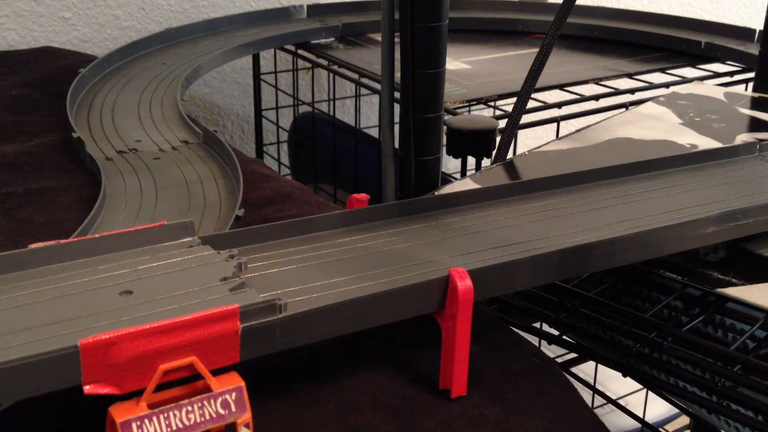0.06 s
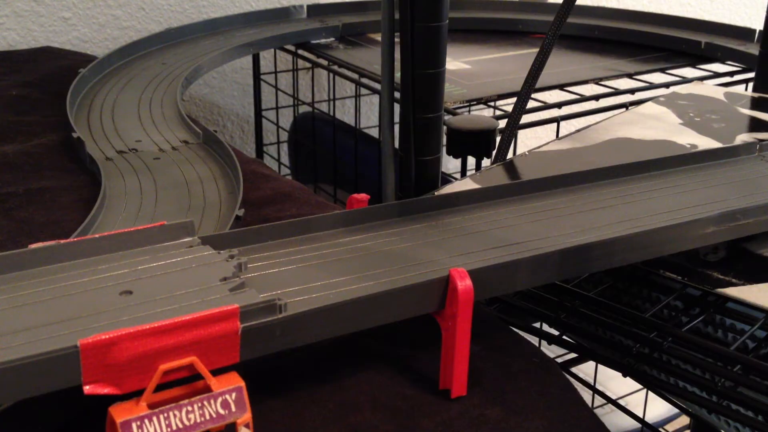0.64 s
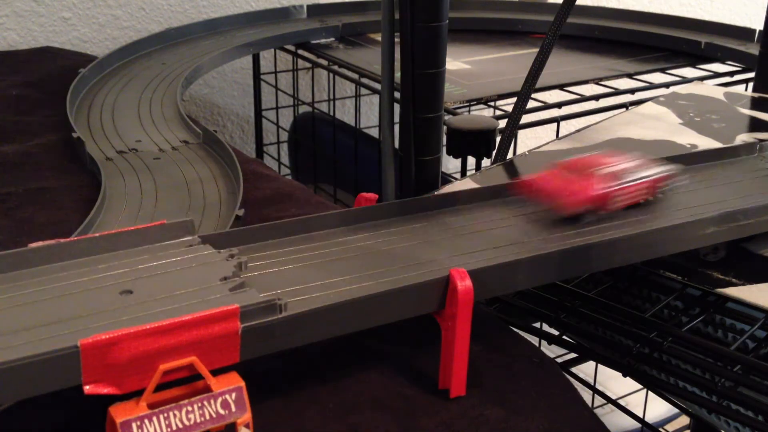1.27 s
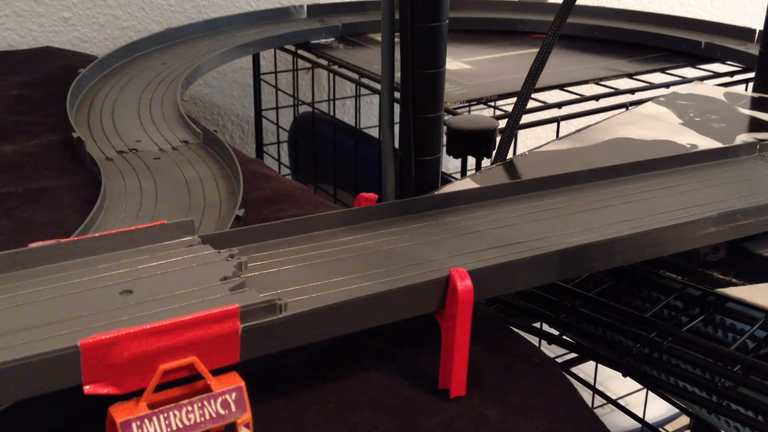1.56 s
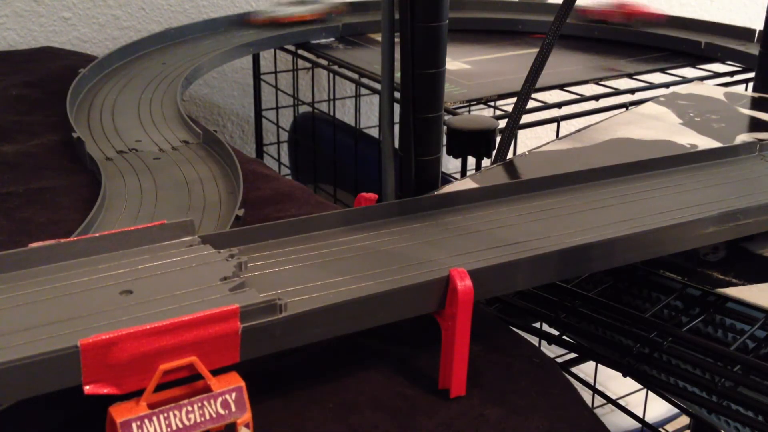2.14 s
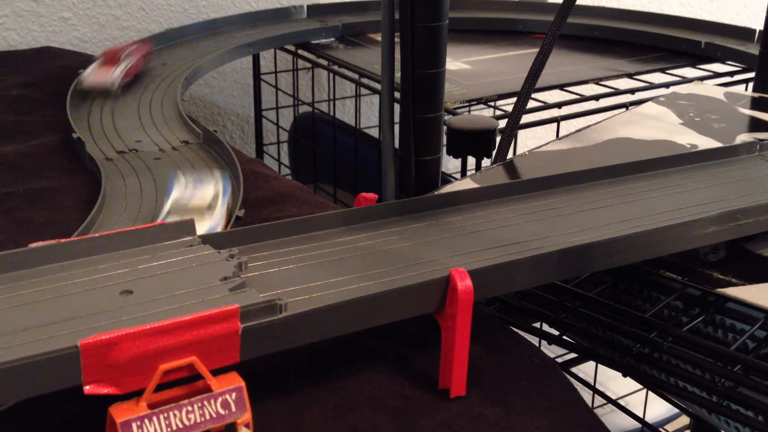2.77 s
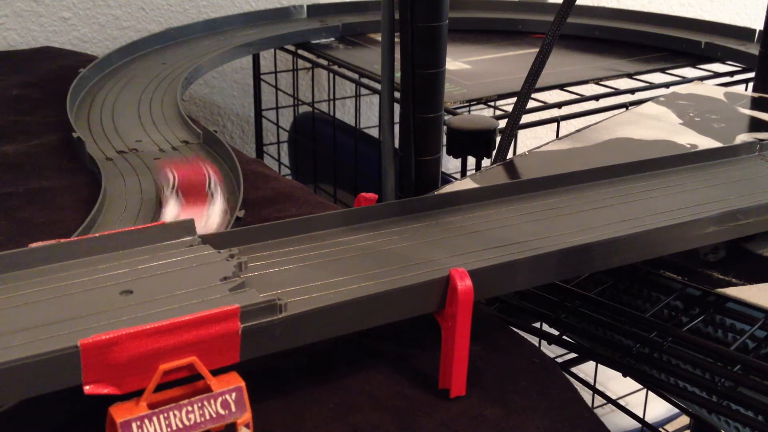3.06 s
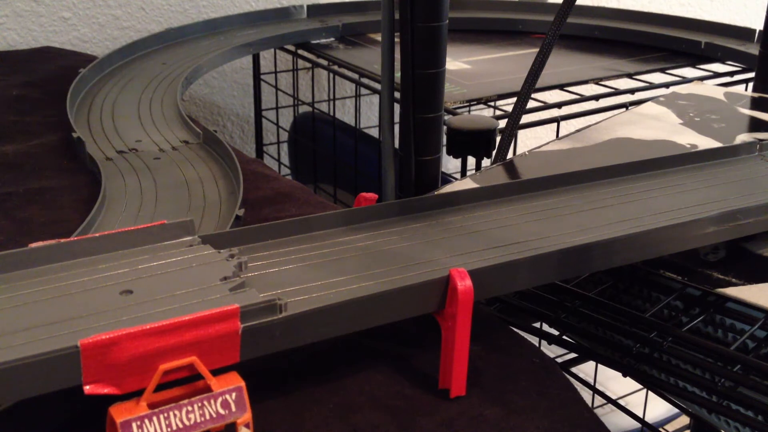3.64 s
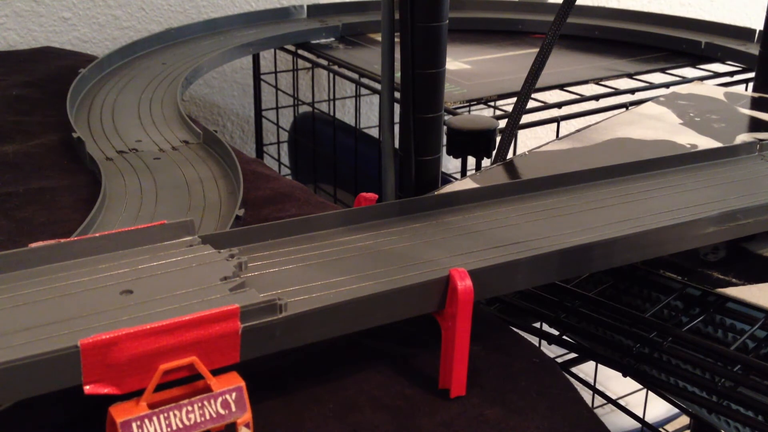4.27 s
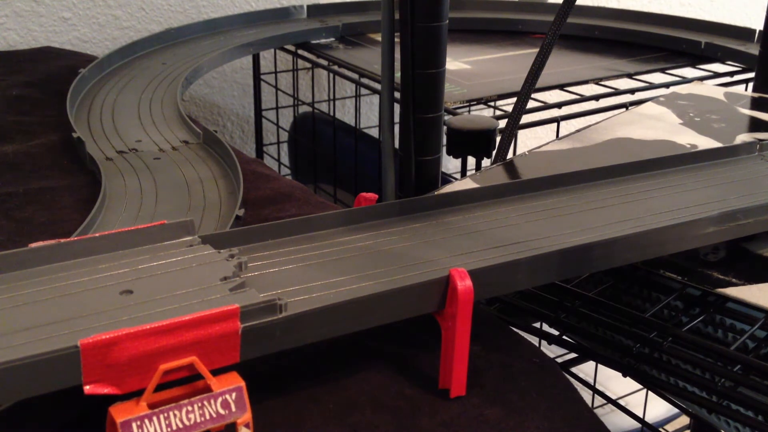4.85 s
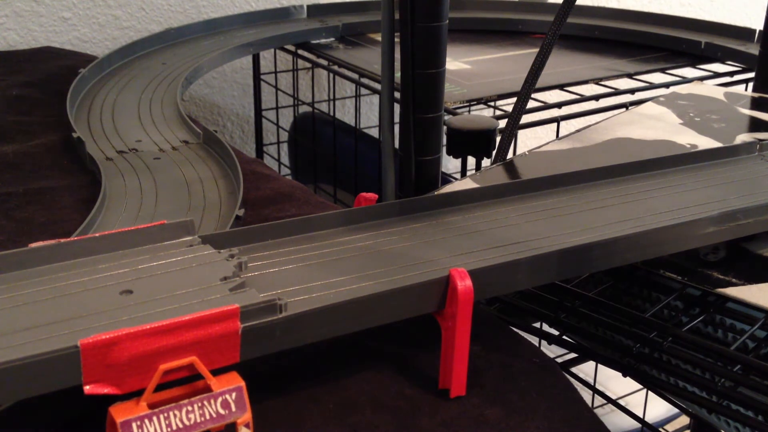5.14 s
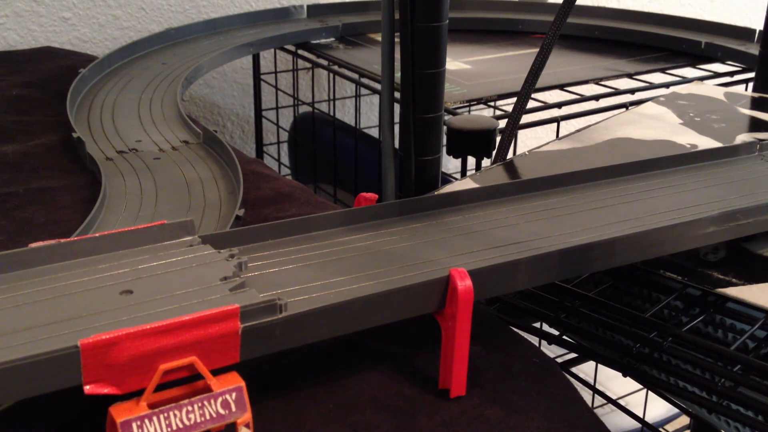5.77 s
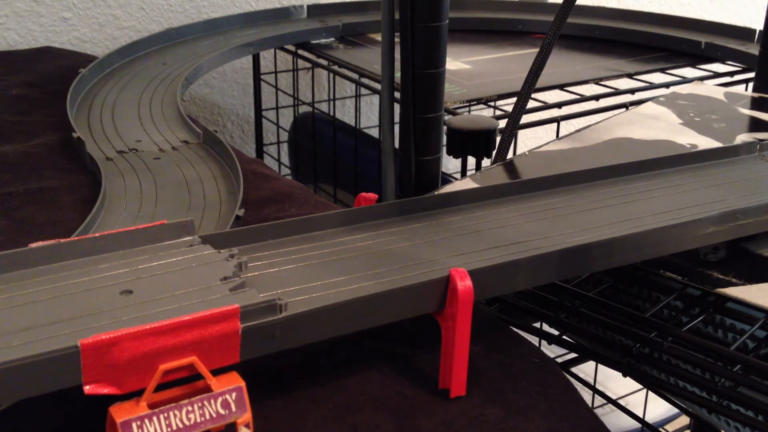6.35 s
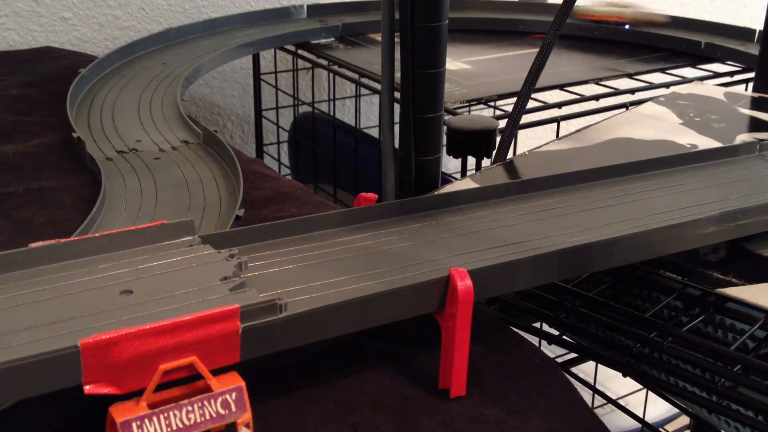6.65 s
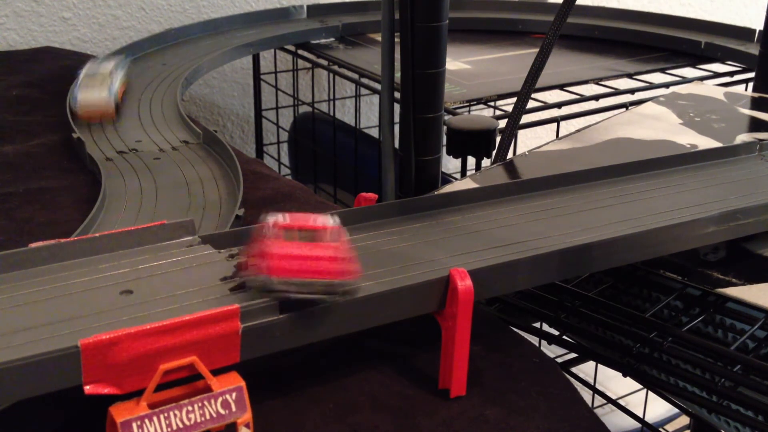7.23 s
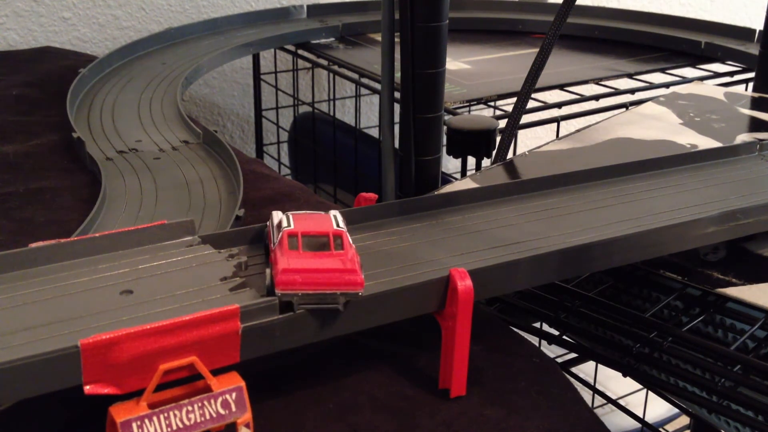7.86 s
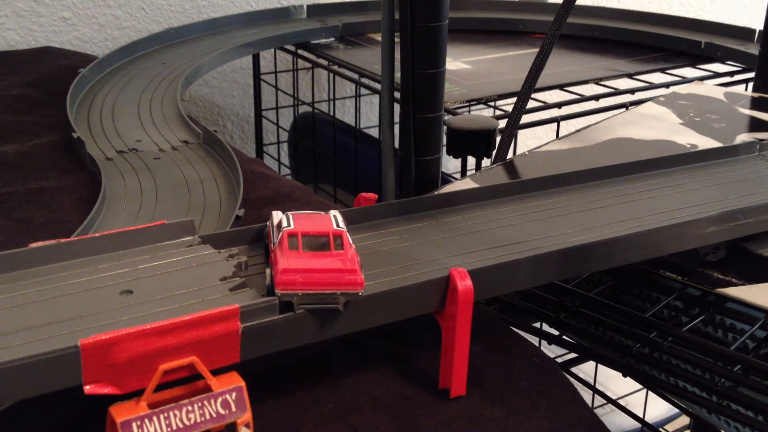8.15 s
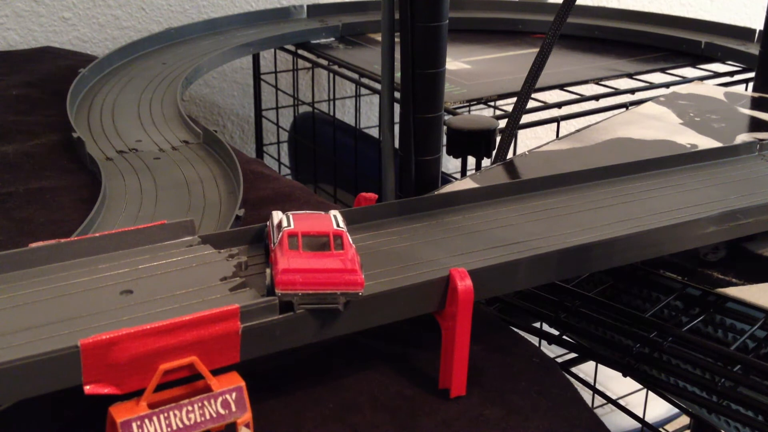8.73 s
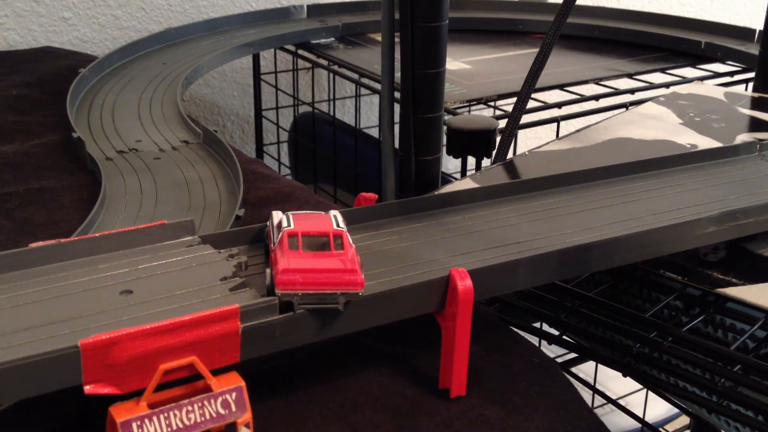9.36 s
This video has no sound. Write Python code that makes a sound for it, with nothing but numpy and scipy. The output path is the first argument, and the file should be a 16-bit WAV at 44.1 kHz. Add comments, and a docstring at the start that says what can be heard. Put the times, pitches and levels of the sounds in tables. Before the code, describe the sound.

A continuous bright whirr and gritty hiss comes from two small slot cars racing on a plastic tabletop track, close to the microphone in a small room. The rattling rises and falls as they pass, dotted with irregular clacks, short scrapes, soft hollow thuds and brief motor whines. About three quarters of the way through, one car clatters out of its slot while the other runs on to the end.

```python
"""Two toy slot cars lap a plastic tabletop track in a small room, heard from close by.
From the start, over a faint drone, wheels drum on the hollow track, gears whirr, shells rattle
and pickup shoes hiss along the metal rails, swelling with each pass. Lap after lap the cars
scrape through bends and clack over joints. Late on, one jumps its slot in a burst of hard
clacks and skids; the other runs on to the end."""
import sys
import numpy as np
from scipy import signal
from scipy.fft import rfft, irfft
from scipy.io import wavfile
from scipy.ndimage import uniform_filter1d, map_coordinates

SR = 44100
rng = np.random.default_rng(int(sys.argv[2]) if len(sys.argv) > 2 else 0)


def generate_wav(sig):
    """Save sig (samples, or channels by samples) to the path in sys.argv[1] as 16-bit PCM at SR."""
    pcm = np.round(np.clip(np.atleast_2d(sig).T, -1, 1) * 32767).astype(np.int16)
    wavfile.write(sys.argv[1], SR, pcm)


N = 414540
TIME = np.arange(N) / SR


def from_db(db):
    """Decibels to gain."""
    return 10 ** (np.asarray(db) / 20)


def unit_rms(x):
    """Scale to rms 1."""
    return x / np.sqrt(np.mean(x ** 2) + 1e-20)


def curves(rows):
    """Level columns of a timed table, interpolated per sample."""
    times_s, *columns = np.transpose(rows)
    return [np.interp(TIME, times_s, column) for column in columns]


def swell(centre_s, half_width_s):
    """Gaussian bump, height 1."""
    return np.exp(-np.minimum(((TIME - centre_s) / half_width_s) ** 2, 20))


def drift(per_s):
    """Random wander through per_s new values a second; rms 1."""
    return unit_rms(np.interp(TIME * per_s, np.arange(1000), rng.standard_normal(1000)))


def chatter(per_s, spread_db, t60_s):
    """Power of tiny random bounces: instant rise, fast decay; mean 1."""
    sizes = from_db(spread_db * np.minimum(rng.exponential(1, N), 3.5)) ** 2
    bounces = sizes * (rng.random(N) < per_s / SR)
    power = signal.lfilter([1], [1, -from_db(-120 / (t60_s * SR))], bounces + 1e-18)
    return power / power.mean()


def friction(bounces, share):
    """Sliding contact force, with a share of its power in bounces."""
    return rng.standard_normal(N) * np.sqrt(1 - share + share * bounces)


def grit(per_s, spread_db):
    """Sharp ticks of dust and sparks under the shoes; rms 1."""
    sizes = from_db(spread_db * np.minimum(rng.exponential(1, N), 4)) * rng.choice([-1, 1], N)
    return unit_rms(sizes * (rng.random(N) < per_s / SR))


def supply(ripple, mains_hz=59.9):
    """Motor throb from mains ripple in the track current."""
    return 1 + ripple * np.sin(2 * np.pi * mains_hz * TIME)


def blows(starts_s, levels_db, t60s_s, snap_db, room_db=-16.5, room_t60_s=0.29, size=12000):
    """Impact force: a snap, a dying buzz of loose plastic, then the room's diffuse tail."""
    force, age_s = np.zeros(N + size), np.arange(size) / SR
    attack = 1 - np.exp(-age_s / 0.00037)
    tail = from_db(room_db - 60 * age_s / room_t60_s)
    for start_s, level_db, t60_s in zip(starts_s, levels_db, t60s_s):
        buzz = from_db(-60 * age_s / t60_s)
        envelope = from_db(level_db) * attack * np.hypot(buzz, tail)
        start = round(start_s * SR)
        force[start:start + size] += envelope * rng.standard_normal(size)
        force[start] += from_db(level_db + snap_db)
    return force[:N]


def body(force, colour, modes=(), size=8192):
    """Driven body: broad colour plus resonances, as a minimum-phase response of unit energy."""
    freq_hz = np.maximum(np.arange(size // 2 + 1) * SR / size, 1)
    knots_hz, knots_db = np.transpose(colour)
    gain_db = np.interp(np.log(freq_hz), np.log(knots_hz), knots_db)
    for centre_hz, width_hz, lift_db in modes:
        gain_db += lift_db / (1 + (2 * (freq_hz - centre_hz) / width_hz) ** 2)
    cepstrum = irfft(np.log(from_db(gain_db)))[:size // 2]
    response = irfft(np.exp(2 * rfft(cepstrum, size)))
    return signal.oaconvolve(force, response / np.linalg.norm(response))[:N]


def sing(force, pitch_hz, width_hz):
    """Steep-sided resonance: two driven resonators in series; rms 1."""
    stage_width_hz = width_hz * np.pi / 2
    radius = np.exp(-np.pi * stage_width_hz / SR)
    feedback = [1, -2 * radius * np.cos(2 * np.pi * pitch_hz / SR), radius ** 2]
    for _ in range(2):
        force = signal.lfilter([1, 0, -1], feedback, force) * (1 - radius ** 2) / 2
    return unit_rms(force)


def sung_swells(rows, force, width_hz):
    """Unsteady tones that swell and fade, driven by one force."""
    return sum(from_db(level_db) * swell(centre_s, half_width_s) * sing(force, pitch_hz, width_hz)
               for centre_s, half_width_s, level_db, pitch_hz in rows)


def rasp(modes, bounces, share, wander_per_s, bend, wander_db=3.0, bend_hz=5):
    """Loose parts buzz in turn: each mode swells, fades and bends by itself; rms 1."""
    out = 0
    for pitch_hz, width_hz, level_db in modes:
        own_bounces = chatter(per_s=130, spread_db=4.5, t60_s=0.053)
        tone = sing(friction((bounces + own_bounces) / 2, share), pitch_hz, width_hz)
        # a changing path length bends the pitch
        sway = np.sin(2 * np.pi * bend_hz * TIME + np.pi * drift(3))
        delay_samples = bend * SR / (2 * np.pi * bend_hz) * sway
        tone = map_coordinates(tone, [np.arange(N) - delay_samples], order=2)
        out += from_db(level_db + wander_db * np.clip(drift(wander_per_s), -2, 2)) * tone
    return unit_rms(out)


# hollow track resonances: centre_hz, width_hz, lift_db
TRACK_RESONANCES = [(157.5, 22, 8), (211, 23, 7), (278, 38, 5.5), (385, 41, 1.5), (880, 100, 0),
                    (1170, 74, 3), (1377, 31, 3)]
def track(force, colour):
    """Hollow track driven through a contact of the given colour."""
    return body(force, colour, TRACK_RESONANCES)


# shell and chassis resonances: centre_hz, width_hz, lift_db
SHELL_RESONANCES = [(2440, 190, -3.5), (3420, 110, 3), (3960, 100, 4), (4970, 210, 0), (7980, 440, 2),
                    (11600, 810, 2)]
def shell(force, colour):
    """Car shell driven through a contact of the given colour."""
    return body(force, colour, SHELL_RESONANCES)


# drone levels: time_s, hum_db, tones_db
DRONE_LEVELS = [(0, -61, -38.5), (.8, -69, -40.5), (1.3, -74, -60), (2.4, -76, -53), (3.2, -60, -50),
                (4.2, -58.5, -46.5), (5.2, -61, -38), (6.2, -63, -42.5), (6.9, -68, -40.5),
                (7.8, -65.5, -47), (8.5, -59, -44.5), (9.4, -61, -44)]
# hum spectrum: freq_hz, density_db
HUM_COLOUR = [(25, -27), (50, -30), (70, -11), (95, 14), (120, 31.5), (160, -19), (300, -44)]
# drone tones: pitch_hz, width_hz, level_db
FAINT_TONES = [(158, 14.9, -10.5), (202.7, 14.7, -9), (288.7, 15.8, -14), (725, 28, -9.5), (767, 15, -7.5)]
def drone(waver_db=3.0):
    """Deep hum and faint tones that come and go, wavering about steady pitches."""
    hum_db, tones_db = curves(DRONE_LEVELS)
    hum = from_db(hum_db) * body(rng.standard_normal(N), HUM_COLOUR)
    tones = 0
    for pitch_hz, width_hz, level_db in FAINT_TONES:
        # a random walk of phase widens the tone
        steps = uniform_filter1d(rng.standard_normal(N), size=500)
        walk_rad = np.cumsum(steps) * np.sqrt(2 * np.pi * width_hz / SR)
        gain = from_db(level_db + waver_db * np.clip(drift(20), -2.5, 1.4))
        tones += gain * np.sin(2 * np.pi * pitch_hz * TIME + walk_rad)
    highpass = signal.butter(4, 120, "high", fs=SR, output="sos")
    return hum + from_db(tones_db - 2.5) * signal.sosfilt(highpass, tones)


# track booms: centre_s, half_width_s, level_db, pitch_hz
TRACK_BOOMS = [(3.06, 0.031, -48, 252), (3.58, 0.056, -39, 268), (5.23, 0.042, -41, 200),
               (7.17, 0.029, -39.5, 192), (8.205, 0.031, -40, 253), (8.32, .08, -47, 266),
               (9.12, 0.04, -44, 186)]
def booms():
    """The hollow track booms at one low resonance."""
    return sung_swells(TRACK_BOOMS, rng.standard_normal(N), width_hz=52)


# section drops: start_s, level_db, t60_s
SECTION_DROPS = [(1.088, -38.5, .16), (1.655, -37.5, 0.096), (2.698, -50, .12), (3.071, -40, 0.12),
                 (3.551, -52, .16), (4.308, -44, 0.15), (4.718, -47, 0.17), (5.203, -44, .16),
                 (6.011, -40, 0.2), (7.134, -34.5, 0.093), (7.226, -42, .1), (7.313, -45, .14),
                 (8.172, -51, .12)]
# thud spectrum: freq_hz, density_db
THUD_COLOUR = [(25, -29), (70, -29), (130, -35), (220, -11), (450, 5.5), (900, 12.5), (1500, -27),
               (5000, -35)]
def thuds():
    """A loose track section drops onto its support under a car."""
    start_s, level_db, t60_s = np.transpose(SECTION_DROPS)
    return track(blows(start_s, level_db + 5.5, t60_s, snap_db=-17), THUD_COLOUR)


# motor whines: centre_s, half_width_s, level_db, pitch_hz
MOTOR_WHINES = [(0.19, .04, -41, 1390), (0.62, .2, -40, 1417), (0.99, 0.077, -43, 1370),
                (5.15, 0.21, -46, 1390), (5.66, 0.13, -42, 1410), (5.95, 0.1, -42, 1320),
                (6.42, 0.11, -41.5, 1405), (6.69, 0.062, -37, 1370), (6.8, 0.12, -41, 1295),
                (7.15, .02, -36, 1330)]
def whines():
    """A motor whines briefly in a narrow band."""
    return sung_swells(MOTOR_WHINES, rng.standard_normal(N), width_hz=55)


# scrapes in bends: centre_s, half_width_s, level_db, pitch_hz
BEND_SCRAPES = [(0.88, .08, -32, 2480), (0.96, .12, -31, 3600), (1.38, 0.046, -37, 1950),
                (1.52, 0.052, -52, 3000), (2.84, 0.022, -31, 3620), (2.91, 0.043, -32, 1970),
                (3.06, .04, -29, 3250), (3.26, 0.033, -32, 3850), (3.74, 0.071, -37, 2480),
                (3.92, .025, -35, 3170), (4.12, .07, -36, 3280), (4.95, .15, -40, 3260),
                (5.57, 0.022, -31, 2340), (5.87, .06, -31, 3500), (5.95, .05, -35.5, 1990),
                (6.25, 0.039, -34.5, 1780), (7.65, .04, -34, 2100), (7.95, .035, -33, 4400),
                (8.05, .04, -39, 4600), (8.53, 0.18, -37, 3820), (8.93, 0.058, -36, 3720),
                (9.11, .05, -38, 2500), (9.26, 0.15, -38.5, 3560)]
def scrapes():
    """A shell or guide pin slips in a bend and rings at one pitch."""
    slips = friction(chatter(per_s=260, spread_db=3.0, t60_s=0.016), share=0.75) * supply(ripple=0.2)
    return sung_swells(BEND_SCRAPES, slips, width_hz=460)


# struck shell spectrum: freq_hz, density_db
KNOCK_COLOUR = [(60, -57), (500, -45), (2200, 5), (3600, 12.5), (6300, 13.5), (8000, 9.5), (11000, -5),
                (15000, -48)]
def taps(rattle_db, per_s=20, lift_db=-10, spread_db=4, t60_s=0.0073):
    """Light random blows on the shells at the joints, louder with a car near."""
    starts = np.flatnonzero(rng.random(N) < per_s / SR)
    levels_db = rattle_db[starts] + lift_db - spread_db * rng.standard_normal(N)[starts]
    force = blows(starts / SR, levels_db, np.full(len(starts), t60_s), snap_db=20)
    return shell(force, KNOCK_COLOUR)


# pin, shoe and shell impacts: start_s, level_db, track_offset_db, shoe_offset_db, shell_t60_s, ring_hz
IMPACTS = [(0.189, -8, -13, -32, .06, 3800), (0.455, -7, -18, -13, 0.056, 3980),
           (0.503, -7, -14.5, -16, .08, 2430), (0.771, -6, -21, -9, 0.039, 7500),
           (0.889, -9, -22, -7, .04, 3400), (0.905, -6, -24, -22, .035, 3500),
           (1.005, 2, -18, -18.5, 0.03, 3720), (1.063, -4.5, -13, -19, 0.045, 4480),
           (1.117, -4, -24, -23, 0.027, 4300), (1.1457, -3, -28, -31, 0.053, 7200),
           (1.335, -12, -12, -16, .05, 4230), (1.489, -7, -17, -30, 0.065, 7950),
           (2.1033, -2, -19, -20, 0.027, 3700), (2.7013, -10.5, -7.5, -13, 0.054, 3430),
           (3.026, -5.5, -13, -18, .03, 3100), (3.073, -5.5, -21, -22, 0.079, 3360),
           (3.097, -15, -26, -5, .05, 3660), (3.4243, -2, -30, -20, .02, 3690),
           (3.534, -5, -14, -21, .045, 4730), (3.5382, -2, -16, -17, 0.038, 2480),
           (3.574, -6, -11, -17, 0.056, 4700), (3.596, -3.5, -16, -16, 0.027, 4820),
           (3.6215, -7, -22, -20, .025, 4900), (3.8761, -11, -20, -18, .02, 4000),
           (3.907, -7, -22, -22, .035, 3300), (3.98, -6, -14, -14, .025, 3300),
           (4.075, -8, -15, -16, .06, 4600), (4.362, -6, -22, -20, 0.046, 3170),
           (5.194, -15.5, -17, -8, .04, 3700), (5.3268, -5, -20, -26, 0.028, 4370),
           (5.5393, -2, -21, -20, .022, 3400), (5.7952, -2, -17, -20, .025, 4900),
           (5.985, -1.5, -28, -10.5, 0.028, 3750), (6.0117, -6, -15, -13, 0.026, 2300),
           (6.193, -8.5, -26, -15, 0.054, 7820), (6.2385, -6, -14, -18, .04, 2700),
           (6.437, -5, -21, -28, .03, 3900), (6.4605, -9, -11, -4, .024, 8700),
           (6.4682, -6.5, -12, -8, 0.028, 7750), (6.709, -10, -9, -16, .028, 4500),
           (6.768, -7.5, -12, -13, .04, 6500), (6.8, -4, -19, -17, 0.027, 5200),
           (6.824, -6, -16, -13, 0.025, 5400), (6.864, -6, -22, -11, 0.016, 5000),
           (6.917, -1, -14.5, -22, 0.024, 6300), (6.931, -3.5, -26, -18, .03, 8100),
           (7.1296, 6.5, -28, -26, 0.015, 6400), (7.135, 0, -28, -15, 0.062, 6340),
           (7.1372, 3.5, -31, -18, 0.056, 3750), (7.141, -4, -27, -22, 0.041, 4100),
           (7.2293, -2.5, -19, -21, 0.023, 3300), (7.359, -7.5, -13, -18, 0.036, 3700),
           (7.4, -12, -9, -17, 0.054, 3440), (7.418, -6.5, -14, -17, 0.05, 3950),
           (7.471, -6, -15, -22, .028, 4200), (7.596, -10, -13, -12, 0.033, 4000),
           (7.6736, -5.5, -11, -20, 0.028, 2080), (7.7342, -3, -16, -22, 0.034, 2930),
           (7.749, -3, -24, -18, 0.028, 3280), (7.757, -8, -26, -10, 0.04, 3300),
           (7.9, -4, -28, -24, .022, 4000), (7.9286, -3, -30, -24, .03, 4060),
           (7.98, -12, -26, -20, .022, 5050), (8.115, -10, -24, -14, .025, 7800),
           (8.1725, -1.5, -21, -11.5, 0.024, 2460), (8.181, -7, -15, -19, 0.055, 4220),
           (8.2132, -7, -24, -16, .04, 4860), (8.7143, -6, -21, -28, 0.058, 2980),
           (8.96, -12, -17, -24, .035, 3700), (9.2678, -21, -28, -6, 0.035, 4300),
           (9.2844, -11, -10.5, -14, .06, 6500)]
# struck track and shoe spectra: freq_hz, density_db
TRACK_HIT_COLOUR = [(50, -61), (200, -55), (700, 3), (1500, 11.5), (2500, 11), (4000, -19), (12000, -48)]
SHOE_HIT_COLOUR = [(60, -65), (2000, -23), (6000, -4), (8000, 0.5), (12000, -4.5), (15000, -5)]
def clacks():
    """Blows at the joints and in the crash sound the track, shell and metal shoes."""
    start_s, level_db, track_offset_db, shoe_offset_db, t60_s, _ = np.transpose(IMPACTS)
    on_track = blows(start_s, level_db + track_offset_db - 9, t60_s * 2.2, snap_db=5)
    on_shell = blows(start_s, level_db - 19, t60_s, snap_db=11)
    on_shoes = blows(start_s, level_db + shoe_offset_db + 2, t60_s * 0.66, snap_db=9)
    return (track(on_track, TRACK_HIT_COLOUR) + shell(on_shell, KNOCK_COLOUR)
            + shell(on_shoes, SHOE_HIT_COLOUR))


def rings(offset_db=-18, stretch=1.06, width_hz=580, size=6000):
    """Each clack rings the part struck hardest, slightly outlasting the shell's buzz."""
    out, age_s = np.zeros(N + size), np.arange(size) / SR
    for start_s, level_db, _, _, t60_s, ring_hz in IMPACTS:
        start = round(start_s * SR)
        envelope = from_db(level_db + offset_db - 60 * age_s / (t60_s * stretch))
        out[start:start + size] += envelope * sing(rng.standard_normal(size), ring_hz, width_hz)
    return out[:N]


# steady running: time_s, rumble_db, whirr_db
LAP_LEVELS = [(0, -47, -38), (.7, -44, -36.5), (1.05, -43.5, -34), (1.3, -46, -37.5), (1.9, -47, -37.5),
              (2.45, -46.5, -38.5), (2.9, -46.5, -36), (3.7, -43, -35), (4.1, -43.5, -38),
              (4.6, -44.5, -38.5), (5.3, -45, -38.5), (5.7, -41.5, -36.5), (6.75, -46.5, -37),
              (7.7, -45, -37.5), (8.65, -47.5, -40.5), (9.4, -43, -42.5)]
# loose stretches of track: centre_s, half_width_s, rumble_db, clatter_db
LOOSE_STRETCHES = [(0.19, 0.066, -47, -44), (1.154, 0.057, -36, -42), (1.4, 0.043, -40, -46),
                   (1.693, 0.092, -45, -49), (2.732, 0.028, -48, -47), (3.05, 0.05, -42, -43),
                   (3.577, 0.098, -40, -41.5), (3.94, 0.023, -54, -37), (4.104, 0.018, -37, -40),
                   (4.31, 0.017, -40, -37), (4.79, 0.11, -42, -42), (5.107, 0.03, -42, -36.5),
                   (5.228, 0.035, -43, -47), (5.64, 0.049, -41, -53), (6.06, 0.032, -38.5, -45),
                   (6.25, 0.033, -43, -44), (6.5, 0.05, -43, -44), (6.98, 0.063, -47, -50),
                   (7.186, 0.027, -38, -57), (7.328, 0.01, -35, -38), (8.088, 0.026, -42, -42),
                   (8.21, 0.032, -36, -51), (8.74, 0.023, -53, -47), (8.994, 0.037, -44, -41.5),
                   (9.158, .04, -56, -44), (9.317, 0.025, -52, -36)]
# wheel, loose track and gear spectra: freq_hz, density_db
RUMBLE_COLOUR = [(25, -50), (50, -38), (75, -20), (100, -17), (130, -2), (200, 2.5), (400, 4), (540, -1),
                 (750, 0), (1200, -10.5), (3000, -61.5)]
CLATTER_COLOUR = [(60, -46), (400, -20.5), (650, -8), (920, -0.5), (1200, -5.5), (1700, -11), (3000, -16),
                  (9000, -45)]
WHIRR_COLOUR = [(50, -35), (250, -41), (550, -14), (750, -4.5), (1050, -3), (1400, 1), (1900, 2),
                (2600, -2), (4000, -9), (9000, -22.5)]
def wheels_and_gears(bounces, load, throb):
    """Wheels and gears drive the hollow track; loose stretches drum and clatter."""
    rumble_db, whirr_db = curves(LAP_LEVELS)
    drum_power, clatter_power = sum(from_db(levels_db)[:, None] ** 2 * swell(centre_s, half_width_s)
                                    for centre_s, half_width_s, *levels_db in LOOSE_STRETCHES)
    rumble_gain = from_db(-1) * np.sqrt(from_db(rumble_db) ** 2 + drum_power)
    gears = friction(chatter(per_s=260, spread_db=-0.5, t60_s=0.019), share=0.24) * load * throb
    rumble = unit_rms(track(friction(bounces, share=0.24), RUMBLE_COLOUR))
    clatter = unit_rms(track(friction(bounces, share=0.69), CLATTER_COLOUR))
    whirr = unit_rms(track(gears, WHIRR_COLOUR))
    return rumble_gain * rumble + np.sqrt(clatter_power) * clatter + from_db(whirr_db + 1.3) * whirr


# shell and shoe spectra: freq_hz, density_db
RATTLE_COLOUR = [(60, -65), (600, -50), (1500, -27.5), (2300, 1), (3200, 2), (4400, 0.5), (5600, -1),
                 (7500, -0.5), (9500, -18), (15000, -25)]
HISS_COLOUR = [(60, -54), (1500, -50), (4000, -1.5), (6500, 1.5), (9000, 2.5), (11000, 0), (13200, 0),
               (15000, 0)]
def shells_and_shoes(bounces, load, throb, rattle_db, hiss_db):
    """Shells rattle while pickup shoes skip and hiss along gritty rails."""
    shoe_bounces = chatter(per_s=380, spread_db=2.5, t60_s=0.082)
    ticks = grit(per_s=600, spread_db=6.5)
    shaking = friction(bounces * np.sqrt(shoe_bounces), share=0.28) + from_db(-9) * ticks
    sliding = friction(shoe_bounces, share=0.64) + from_db(-20) * ticks
    rattle = unit_rms(shell(shaking * load * throb, RATTLE_COLOUR))
    hiss = unit_rms(shell(sliding * throb, HISS_COLOUR))
    return from_db(rattle_db - 2.5) * rattle + from_db(hiss_db + 2.5) * hiss


# loose gear and axle resonances: pitch_hz, width_hz, level_db
AXLE_RESONANCES = [(2037, 110, -4.5), (2327, 110, -0.5), (2562, 110, 2), (2867, 120, 1.5), (3184, 54, -0.5),
                   (3490, 88, -3.5), (3740, 87, 0.5), (4170, 92, 0.5), (4700, 330, 3.5)]
def axle_rasp(bounces, rattle_db):
    """Loose gears and axles rasp just under the shell rattle."""
    buzz = rasp(AXLE_RESONANCES, bounces, share=0.6, wander_per_s=40, bend=0.0253)
    return from_db(rattle_db - 5.5) * buzz


# singing chassis resonances: pitch_hz, width_hz, level_db
CHASSIS_RESONANCES = [(2830, 350, -25), (3430, 480, 7.5), (4020, 360, 3.5), (4480, 320, 0.5),
                      (5020, 560, 9.5), (7540, 540, 6.5), (8450, 140, 5), (9400, 680, 6.5),
                      (11070, 840, -0.5)]
def chassis_whizz(bounces, whizz_db):
    """The bouncing chassis sings, throbbing with the supply."""
    buzz = rasp(CHASSIS_RESONANCES, bounces, share=1.0, wander_per_s=30, bend=0.0135)
    return from_db(whizz_db) * supply(ripple=0.4) * buzz


# close passes: nearest_s, approach_s, retreat_s, rattle_db, hiss_db, whizz_db
CAR_PASSES = [(0.2, 0.31, 0.26, -32, -36, -38), (0.5, 0.044, 0.081, -34, -35, -45),
              (0.77, 0.24, 0.14, -38, -26.5, -36), (0.95, 0.21, 0.23, -27.5, -29.5, -33),
              (1.1, 0.063, 0.041, -38, -35, -34), (1.35, 0.16, 0.28, -34, -41, -55),
              (2.85, 0.099, 0.07, -44.5, -37, -46), (3.069, 0.31, 0.025, -33, -39, -42),
              (3.52, 0.39, 0.072, -30, -30, -36.5), (3.94, 0.49, 0.069, -31, -29, -32),
              (4.3, 0.4, 0.14, -33, -37, -51), (5.05, 0.73, 0.35, -35, -35.5, -48),
              (5.75, 0.36, 0.2, -32, -29.5, -39.5), (5.93, 0.12, 0.14, -29, -32, -35),
              (6.22, 0.036, 0.079, -31, -39, -49), (6.45, 0.19, 0.11, -31.5, -31, -49),
              (6.89, 0.27, 0.48, -33, -33, -37.5), (7.52, 0.12, 0.22, -35, -48, -47),
              (7.76, 0.13, 0.056, -36, -33, -40), (7.96, 0.091, 0.17, -30.5, -33, -30.5),
              (8.1, 0.15, 0.11, -36, -32, -33), (8.4, 0.049, 0.12, -32, -35, -35.5),
              (8.95, 0.095, 0.065, -37, -38, -43), (9.31, 0.12, 0.25, -42, -34, -42)]
def passing_levels(far_rattle_db=-34, far_hiss_db=-38, far_whizz_db=-52, falloff=1.57):
    """Rattle, hiss and whizz in dB: passes over the far cars; falloff 1 is inverse square."""
    power = from_db([[far_rattle_db], [far_hiss_db], [far_whizz_db]]) ** 2
    for nearest_s, approach_s, retreat_s, *levels_db in CAR_PASSES:
        away = (TIME - nearest_s) / np.where(TIME < nearest_s, approach_s, retreat_s)
        power = power + from_db(levels_db)[:, None] ** 2 / (1 + away ** 2) ** falloff
    return 10 * np.log10(power)


# dips in the running sound: centre_s, half_width_s, depth_db
LEVEL_DIPS = [(1.235, 0.087, 3), (1.897, 0.089, 1), (2.45, 0.091, 1.5), (3.523, 0.0087, 5.5),
              (4.6, 0.066, 1), (6.11, 0.037, 1), (6.574, 0.03, 1), (7.106, .025, 1.5), (7.29, 0.015, 4),
              (7.387, .012, 4.5), (7.84, 0.017, 2.5), (8.169, 0.0047, 8), (8.842, 0.028, 0.5)]
def running_cars():
    """Wheels, shells and axles shake with one bouncing chassis; the level dips briefly at times."""
    rattle_db, hiss_db, whizz_db = passing_levels()
    bounces = chatter(per_s=380, spread_db=3.0, t60_s=0.015)
    throb = supply(ripple=0.033)
    load = from_db(0.98 * drift(90))  # the chassis rocks on the track
    cars = wheels_and_gears(bounces, load, throb)
    cars += shells_and_shoes(bounces, load, throb, rattle_db, hiss_db)
    cars += (axle_rasp(bounces, rattle_db) + chassis_whizz(bounces, whizz_db)) * load
    cars += taps(rattle_db)
    dip_db = sum(depth_db * swell(centre_s, half_width_s)
                 for centre_s, half_width_s, depth_db in LEVEL_DIPS)
    return cars * from_db(-dip_db)


def scene():
    """All sources at one point, alike in both channels."""
    sound = drone() + booms() + thuds() + whines() + scrapes() + clacks() + rings() + running_cars()
    return np.stack([sound, sound])


def record(dry, ceiling=1.6, cutoff_hz=15350):
    """Soft-clip the peaks, then low-pass."""
    rounded = np.tanh(dry / ceiling) * ceiling
    return signal.sosfilt(signal.ellip(12, .1, 80, cutoff_hz, fs=SR, output="sos"), rounded)


dry = scene()
out = record(dry)
generate_wav(out)
```